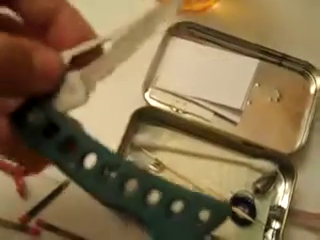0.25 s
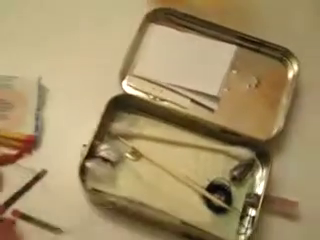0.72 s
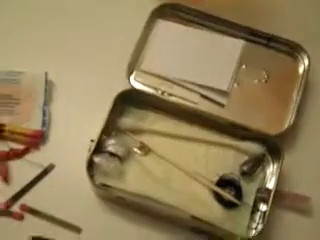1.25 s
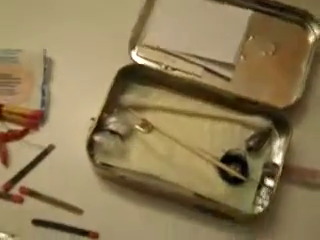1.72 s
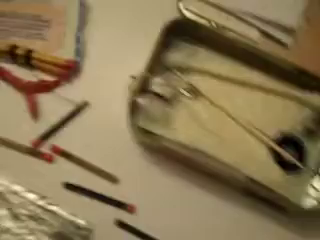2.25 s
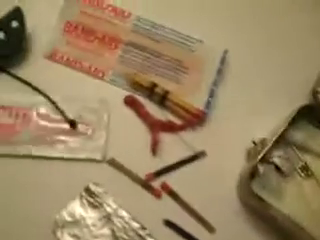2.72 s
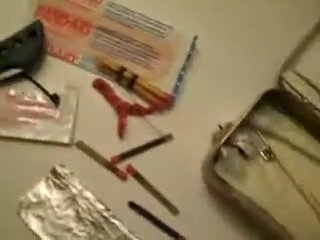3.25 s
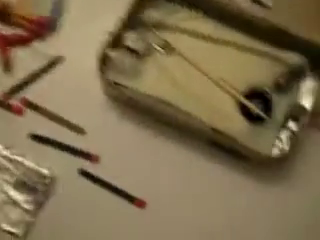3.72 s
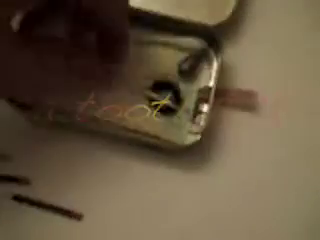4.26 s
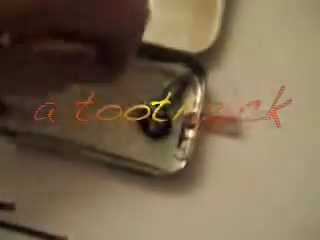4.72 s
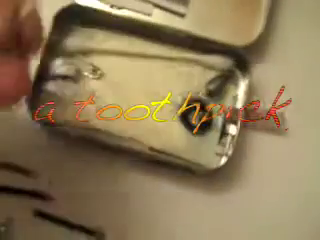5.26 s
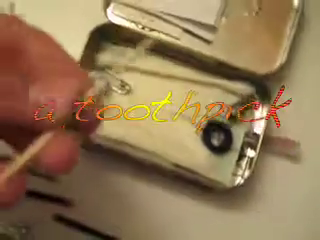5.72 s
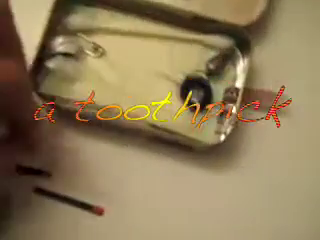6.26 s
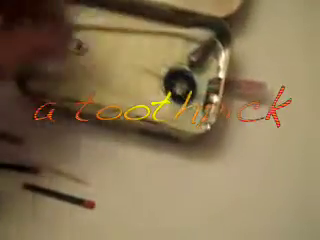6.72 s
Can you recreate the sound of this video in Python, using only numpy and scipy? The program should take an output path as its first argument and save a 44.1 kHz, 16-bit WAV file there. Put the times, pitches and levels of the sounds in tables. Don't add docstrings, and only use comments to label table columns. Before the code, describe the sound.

Soft strap slides and ticks, then a small metal tin clacks and scrapes on a table, contents rattling out, followed by faint finger picking over steady hiss.

```python
import sys
import numpy as np
from scipy import signal
from scipy.fft import rfft, irfft
from scipy.io import wavfile

SR = 44100
rng = np.random.default_rng(int(sys.argv[2]) if len(sys.argv) > 2 else 0)


def boost(x):
    u = np.asarray(x, float) / 20
    return 10 ** u


def master_out(mix):
    frames = np.transpose(np.atleast_2d(mix))
    ceiling = np.clip(frames, -1, 1)
    pcm = np.round(ceiling * 32767).astype(np.int16)
    wavfile.write(sys.argv[1], SR, pcm)


N = 308700

# low edge f/Hz, high edge f/Hz, level that undoes the port's lift/dB,
# share unlike at the two ports
PARTS = [
    (6590, 9050, -8, 1.1),
    (4700, 6500, -4.5, 0.33),
    (1750, 4400, -1.5, 0.32),
    (10300, 14600, 11.5, 2.2),
]


def band(x, lo_hz, hi_hz, order=2):
    return signal.sosfilt(signal.butter(order, [lo_hz, hi_hz], "band", fs=SR, output="sos"), x)


def unit(x):
    return x / np.sqrt(np.mean(x ** 2))


def sides(left_db):
    return boost(np.array([[left_db], [-left_db]]) / 2)


def strokes(rows, sag_db):
    depth_db = 25
    t, power = np.arange(N) / SR, 0
    for s, rise, hold, fade, db in rows:
        before = np.maximum((s - t) / max(rise, .001), 0)
        after = np.maximum((t - s - hold) / max(fade, .001), 0)
        sag = sag_db * np.clip(t - s, 0, max(hold, 0))
        power = power + boost(db - depth_db * (before + after) - sag) ** 2
    return power


def grains(per_s, scatter_db):
    strength = boost(scatter_db * np.minimum(rng.exponential(size=N), 4))
    slips = (rng.random(N) < per_s / SR) * strength
    return unit(slips * rng.standard_normal(N))


def hiss():
    # f/Hz, level per Hz/dB
    hiss_colour = [(12, -39), (20, -18.5), (63, -7), (91, -8.5), (116, -4.5), (301, -7.5), (422, -7.5),
                   (642, -10), (949, -11.5), (1150, -14), (3440, -20), (13500, -26), (16000, -56.5)]
    # f/Hz, level/dB
    left_louder = [(60, 2), (110, 4), (200, 8), (380, 8.5), (700, 8.0), (1290, 6.5), (2380, 4.0),
                   (4400, 2.5), (8120, 1.5), (15000, 0)]
    # f/Hz, left level/dB, right level/dB
    mains = [(120, -76, -78), (970, -92.5, -85)]
    log_hz = np.log(np.fft.rfftfreq(N, 1 / SR) + 1)
    colour, lean = (np.interp(log_hz, np.log(np.array(c)[:, 0]), np.array(c)[:, 1])
                    for c in (hiss_colour, left_louder))
    spectrum = rfft(rng.standard_normal((2, N))) * boost(colour + np.array([lean, -lean]) / 2)
    hum = 0
    for hz, *db in mains:
        tone = np.sqrt(2) * np.sin(2 * np.pi * hz * np.arange(N) / SR)
        hum = hum + boost(np.array(db))[:, None] * tone
    return boost(-60.5) * unit(irfft(spectrum, N)) + hum


def far_hum():
    # full level reached t/s, rise t/s, hold t/s, fade t/s, level/dB
    swells = [(6.085, .04, .03, 0.057, -73), (6.4, .05, .17, .05, -73)]
    pipe_hz = 690
    return np.sqrt(2 * strokes(swells, sag_db=0)) * np.sin(2 * np.pi * pipe_hz * np.arange(N) / SR)


def room(x):
    # low edge f/Hz, high edge f/Hz, t60/s, level/dB, share unlike at the two ports
    wash_bands = [(150.4, 1720, .35, -4.5, 0.13), (1000, 4860, 0.27, -5, 0.42),
                  (4500, 21000, 0.17, -11, .9)]
    t, wash = np.arange(int(.6 * SR)) / SR, 0
    for lo_hz, hi_hz, t60, db, unlike in wash_bands:
        noise = rng.standard_normal((3, len(t)))
        decay = np.exp(-np.log(1000) * t / t60) * (t > .003)
        tail = (noise[0] + unlike * noise[1:]) * decay
        wash = wash + boost(db) * band(tail / np.sqrt(np.sum(tail ** 2) / 2), lo_hz, hi_hz)
    return signal.fftconvolve(x, wash, axes=1)[:, :N]


def bumps():
    # t/s, peak level/dB, centre f/Hz
    hand_bumps = [(2.306, -32.5, 241), (2.44, -44, 110), (2.639, -49, 110), (3.201, -41, 120),
                  (3.27, -40.5, 120)]
    t, out = np.arange(4096) / SR, np.zeros((2, N))
    for s, db, hz in hand_bumps:
        noise = rng.standard_normal((3, len(t)))
        knock = np.exp(-t / 0.0057) * (noise[0] + .7 * noise[1:])
        knock = band(knock, hz / 5, hz * 1.63)
        start = int(s * SR)
        out[:, start:start + len(t)] += boost(db) * knock / np.abs(knock).max()
    return out


def port(x, hz, width_hz, shade_hz):
    w = 2 * SR * np.tan(np.pi * hz / SR)
    x = signal.lfilter(*signal.bilinear([w * w], [1, w * width_hz / hz, w * w], SR), x)
    return signal.lfilter(*signal.butter(2, shade_hz, fs=SR), x)


def tin(force):
    # f/Hz, level/dB, t60/s
    modes = [(124.2, -11.5, 0.1), (306.2, -9, .05), (349, 0.5, .07), (375.5, -0.5, .06), (439, -1.5, 0.034),
             (546, -5.5, .04), (633.4, 1, 0.04), (771, -6, 0.06), (870, -8.5, 0.0405), (1007, -7, .04),
             (1171, -8, .04), (1400, -13.5, .03), (1990, -12.5, 0.033)]
    out = 0
    for hz, db, t60 in modes:
        r, w = np.exp(-np.log(1000) / (t60 * SR)), 2 * np.pi * hz / SR
        out = out + boost(db) * signal.lfilter([.5, 0, -.5], [1, -2 * r * np.cos(w), r * r], force)
    return out


def drag():
    # full level reached t/s, rise t/s, hold t/s, fade t/s, level/dB
    drags = [(2.43, 0.0059, .002, 0.1, -30.5), (2.5, .05, .046, .1, -45), (2.626, 0.012, .06, 0.093, -41),
             (2.916, 0.071, .13, 0.052, -47.5), (3.1, 0.22, .08, .02, -43.5),
             (3.2, 0.032, .002, 0.024, -32.5), (3.208, 0.024, .04, .16, -37),
             (3.482, 0.084, .005, 0.22, -52.5)]
    slips = grains(per_s=1200, scatter_db=3.0)
    hum = unit(tin(band(slips, 230, 734, order=1)))
    scrape = boost(-13.5) * unit(band(slips, 620, 1700))
    return boost(-3.5) * np.sqrt(strokes(drags, sag_db=12)) * (hum + scrape)


def knocks():
    # t/s, peak level/dB, contact t/ms
    blows = [(2.306, -42, 0.083), (2.429, -21, 0.18), (2.445, -37, 0.41), (2.503, -40, 0.6),
             (2.621, -28, 0.24), (2.638, -30.5, 0.32), (3.190, -18.5, 1.23), (3.237, -25, 1.25),
             (3.482, -47, .5), (6.515, -52, 1.5), (6.578, -52, 0.56), (6.657, -41, 1.5), (6.707, -56, 1.34),
             (6.949, -49.5, .2), (6.972, -47, 0.24)]
    t, push = np.arange(256) / SR, np.zeros(N)
    for s, db, ms in blows:
        blow = np.sin(np.pi * np.minimum(t * 1000 / max(ms, .1), 1))
        start = int(s * SR)
        push[start:start + len(t)] += boost(db) * blow / blow.sum()
    return boost(-9.5) * tin(push)


def rub():
    # full level reached t/s, rise t/s, hold t/s, fade t/s, level/dB
    strap_strokes = [(.468, .25, .01, 0.77, -70), (.702, .035, .25, 0.023, -52),
                     (1.086, 0.2, .005, .1, -55), (1.15, .05, 0.078, .1, -64),
                     (1.275, .09, .165, 0.21, -46.5), (1.78, 0.073, .005, 0.063, -50.5)]
    strap_snap = [(1.114, 0.024, .002, 0.015, -28)]
    tin_rustle = [(1.63, .1, .45, .3, -73), (2.25, 0.85, 0.21, 0.012, -65.5), (2.435, .01, 0.23, .01, -66),
                  (2.63, .01, 0.081, 0.2, -59.5), (2.74, .01, 0.086, .05, -74),
                  (2.85, .02, 0.15, .1, -60.5), (3.13, .5, 0.13, 0.39, -55), (3.27, .05, 0.051, .05, -67.5),
                  (3.41, 0.018, 0.0073, 1, -60.5), (3.56, .02, .01, .95, -69.5),
                  (4.55, .08, .005, 0.24, -56)]
    finger_strokes = [(4.352, .006, 0.065, .1, -56), (4.425, 0.1, .03, 0.23, -52.5),
                      (4.69, .15, .02, .02, -65), (5.038, .07, .005, 0.028, -67),
                      (6.172, 0.18, .005, .17, -71.5), (6.448, 0.045, 0.092, .05, -71.5),
                      (6.59, 0.062, .05, 0.31, -67.5), (6.95, 0.0071, .06, .05, -43)]
    # strokes, sag while held/dB/s, left louder/dB,
    # then upper middle, lower middle and finest against treble/dB
    sliders = [(strap_strokes, 22.6, 3.6, -7, -10.5, -9),
               (strap_snap, 7, 4.4, -14.5, -15.5, -12),
               (tin_rustle, 3, -.8, -4, -5.5, -10),
               (finger_strokes, 5, -.3, 1.8, -1.3, -11.5)]
    shared = grains(per_s=9000, scatter_db=2.0)
    own = np.array([grains(per_s=9000, scatter_db=2.5) for _ in range(2)])
    part_power = [0, 0, 0, 0]
    for rows, sag, left_db, *colour_db in sliders:
        power = sides(left_db) ** 2 * strokes(rows, sag)
        for k, rel_db in enumerate([0, *colour_db]):
            part_power[k] = part_power[k] + power * boost(rel_db) ** 2
    out = 0
    for power, (lo_hz, hi_hz, port_db, unlike) in zip(part_power, PARTS):
        texture = unit(band(shared + unlike * own, lo_hz, hi_hz, order=3))
        out = out + boost(port_db - 4.0) * np.sqrt(power) * texture
    return out


def clicks():
    # t/s, treble peak level/dB, dullness as upper middle against treble/dB, rise t/ms
    strap_ticks = [(.4783, -55, -13, .25), (.8674, -45, -9, 0.16), (.9341, -46, -2, 0.32),
                   (1.0515, -47, -11, 0.23), (1.0998, -34, -10, 0.3), (1.1134, -24, -15, 0.78),
                   (1.1247, -33, 1, 0.27)]
    shell_tick = [(2.3067, -31, 3, 0.38)]
    tin_clacks = [(2.4297, -7, -6.5, 0.49), (2.4493, -24, -12, 0.34), (2.504, -24.5, -6.5, 0.32),
                  (2.5119, -26, -10, 0.24), (2.5143, -34, 1, 0.32), (2.5948, -37, -7, .27),
                  (2.6081, -36, -11, 0.27), (2.6214, -16.5, -6, 0.77), (2.6242, -24, -4, 0.88),
                  (2.6385, -19, -7, 0.27), (2.6476, -28, -12, .25), (2.6539, -28, -11, 0.35)]
    rattle = [(2.8654, -40, -13.5, .29), (2.8743, -39, -11, .49), (2.9034, -37, -9.5, .46),
              (2.9084, -40, -11.5, .27), (2.9322, -31.5, -12.5, .47), (2.9427, -40.5, -7, .23),
              (2.9523, -38, -8.5, .23), (2.9705, -33, -11.5, .23), (2.9958, -39.5, -5.5, .2),
              (2.9986, -32, -6.5, .17), (3.0145, -35, -2.5, .22), (3.0212, -35, -5, .2),
              (3.0537, -34, -9.5, .3), (3.0562, -29, -6.5, .19), (3.0585, -35.5, 0, .32),
              (3.0792, -37, -2, .42), (3.0869, -40.5, -5.5, .17), (3.0995, -33.5, -7, .64),
              (3.1235, -19, -2.5, .18), (3.1433, -35, -3.5, .2), (3.1503, -21, -12, .58),
              (3.152, -20, -9.5, .26), (3.157, -15, -17, .32), (3.1603, -14.5, -6, .32),
              (3.163, -17.5, -11, .48), (3.183, -32.5, -10.5, .48)]
    tumble = [(3.1895, -19.5, -7, 0.29), (3.2058, -25, -5, 0.16), (3.2127, -18, -3, 0.3),
              (3.2161, -3.5, -3.5, 0.097), (3.2264, -4, -11, 0.35), (3.2292, -12.5, -2, 0.47),
              (3.2329, -19, -12, .3), (3.237, -16, -11, 0.16), (3.2443, -20, -7.5, 0.47),
              (3.2502, -19, -5, 0.23), (3.2556, -30, -5.5, .58), (3.2628, -18, -5, 0.16),
              (3.2724, -28, -8, 0.24), (3.396, -47, -15, .39), (3.442, -44, -7, .33),
              (3.4473, -37, -8, 0.14), (3.4556, -37, -6, 0.19), (3.4587, -40, -12, .42),
              (3.4745, -28.5, -15, 0.62), (3.4811, -23, -10, 0.24), (3.4917, -27, -10, 0.36),
              (3.5012, -38, -11, 0.11), (3.5203, -24.5, -5.5, 0.16)]
    picking = [(4.3507, -41, -12, 0.092), (4.4012, -40, -5, 0.46), (4.4177, -35, -9, 0.89),
               (4.4494, -41, -1.5, 0.36), (4.5285, -39, 10, 0.16), (4.5399, -26, 7, 0.32),
               (4.5416, -36.5, 7, 0.6), (4.6033, -46, -7, 0.19), (4.6128, -37.5, 2.5, 0.59),
               (4.637, -38.5, 5, 0.38), (4.6675, -48.5, 11, 0.53), (4.6707, -47, 6, .24),
               (4.6982, -51, 10, 0.21), (6.4519, -60, 7, .25), (6.5787, -36, 3, 0.71),
               (6.6113, -43, 1, .25), (6.6565, -26.5, -5.5, 0.67), (6.9485, -40, 7, 0.68),
               (6.9524, -41, 13.5, 0.77), (6.9723, -27.5, 6, 0.21)]
    # contacts, left louder/dB, lower middle and finest against treble/dB,
    # share that excites the room/dB
    strikers = [(strap_ticks, 3.5, -19, -5, -1.5),
                (shell_tick, -.8, -6, -5.5, -16),
                (tin_clacks, -.8, -7.5, -12.5, -1.2),
                (rattle, -0.73, -25.5, -22.5, -1.5),
                (tumble, -1.5, -19.5, -14, -1.6),
                (picking, -0.52, -3, -9, -2.3)]
    dull_reach = 0.14
    t, out = np.arange(512) / SR, np.zeros((2, 2, N))
    for rows, left_db, low_db, fine_db, room_db in strikers:
        for s, db, dull_db, ms in rows:
            shared, *own = rng.standard_normal((3, len(t)))
            rise = t / (max(ms, .05) / 1000)
            shape = rise * np.exp(1 - rise)
            start = int(s * SR)
            for k, rel_db in enumerate([0, dull_db, low_db + dull_reach * dull_db, fine_db]):
                lo_hz, hi_hz, port_db, unlike = PARTS[k]
                chatter = shape * (shared + 1.097 * unlike * np.array(own))
                part = (-1) ** k * band(chatter, lo_hz, hi_hz)
                part = boost(db + rel_db + port_db - 1.0) * sides(left_db) * part / np.abs(part).max()
                out[:, :, start:start + len(t)] += [part, boost(room_db) * part]
    return out


def scene():
    near = rub() + drag() + knocks()
    direct, to_room = clicks()
    return near + direct + room(near + to_room) + far_hum()


def roll_off(x):
    return signal.sosfilt(signal.butter(12, 16510, fs=SR, output="sos"), x)


def record(dry):
    # resonance f/Hz, width f/Hz, shade corner f/Hz
    mic_ports = [
        (7955, 1150, 16700),
        (6780, 1220, 7560),
    ]
    heard = np.array([port(x, *p) for x, p in zip(dry, mic_ports)])
    heard = heard + bumps() + hiss()
    limited = signal.sosfilt(signal.butter(6, 15200, fs=SR, output="sos"), heard)
    mix = np.tanh(0.97 * limited) / 0.85
    return roll_off(mix)


dry = scene()
out = record(dry)
master_out(out)
```